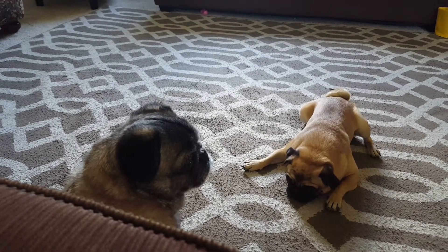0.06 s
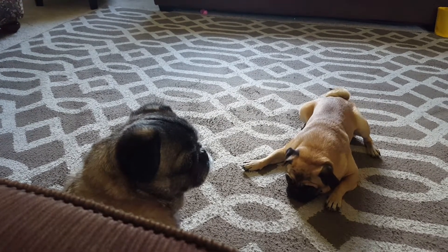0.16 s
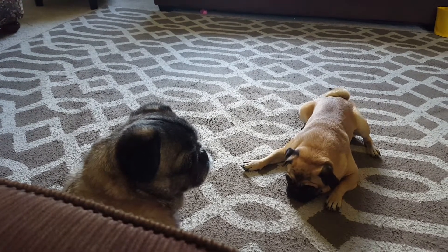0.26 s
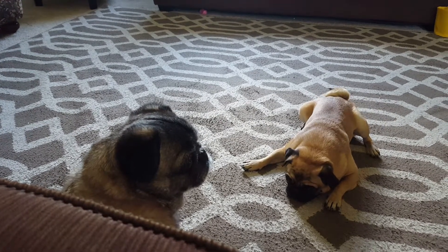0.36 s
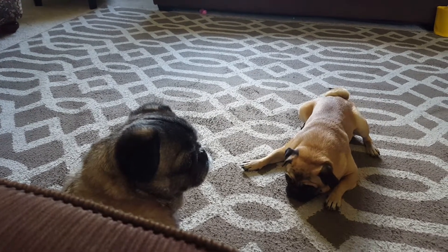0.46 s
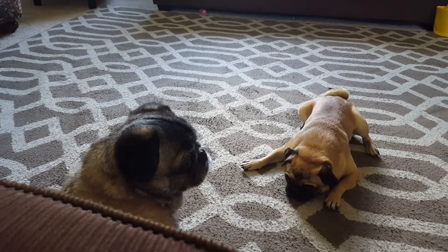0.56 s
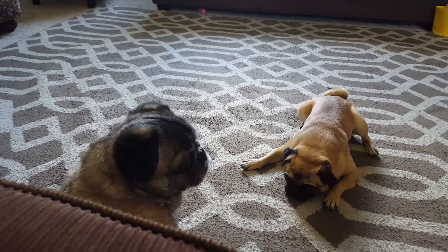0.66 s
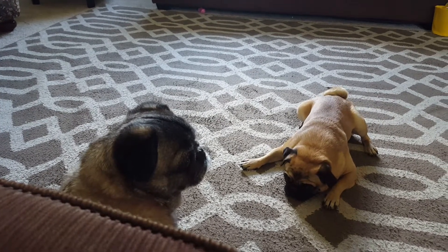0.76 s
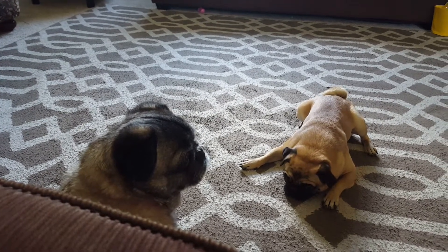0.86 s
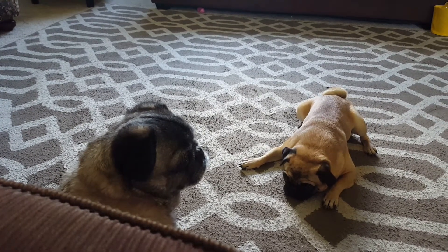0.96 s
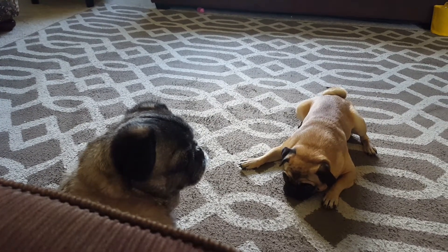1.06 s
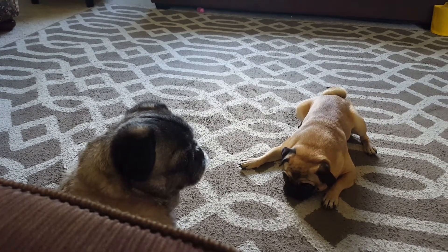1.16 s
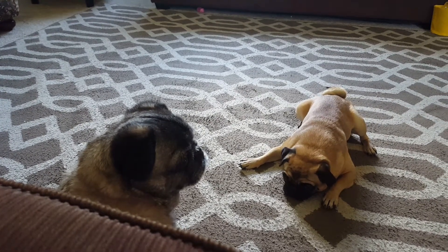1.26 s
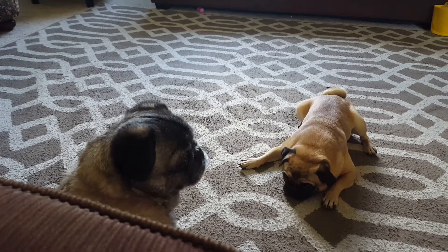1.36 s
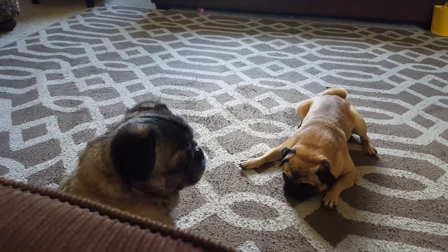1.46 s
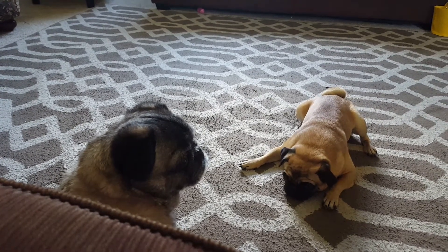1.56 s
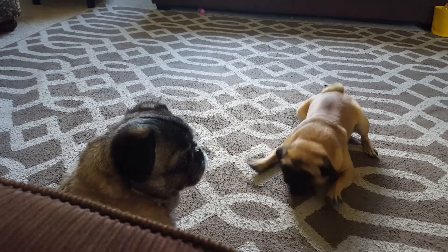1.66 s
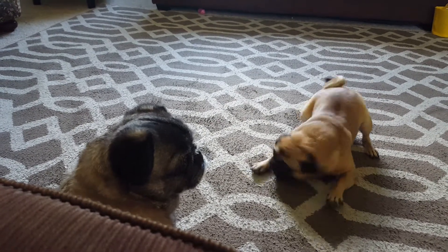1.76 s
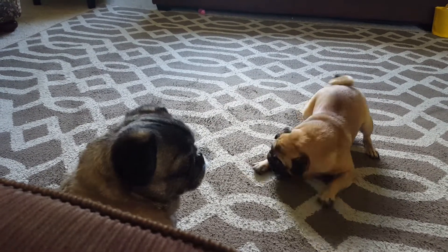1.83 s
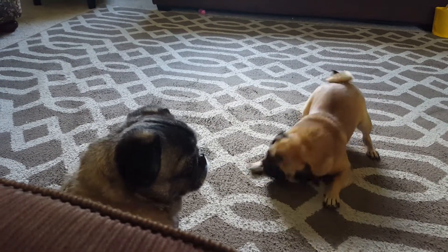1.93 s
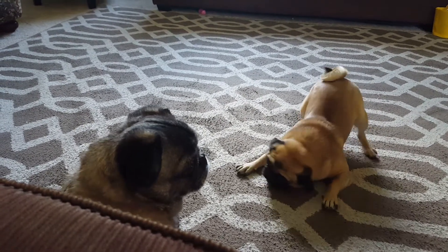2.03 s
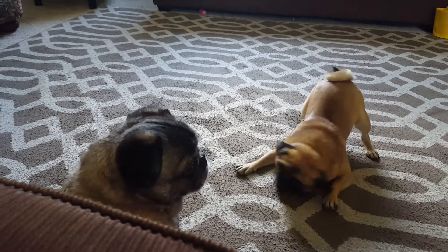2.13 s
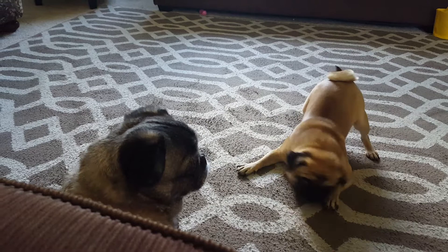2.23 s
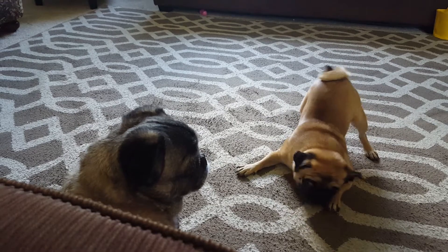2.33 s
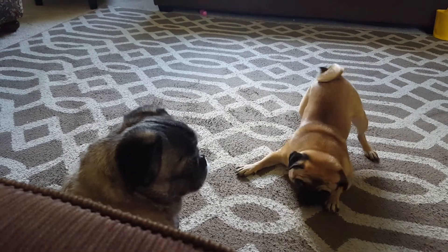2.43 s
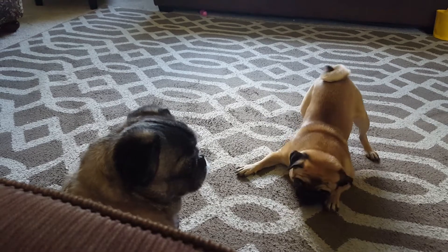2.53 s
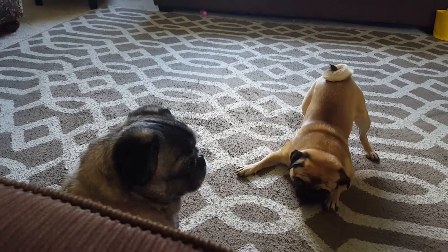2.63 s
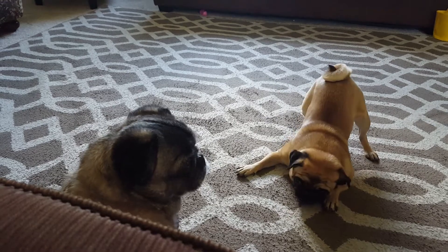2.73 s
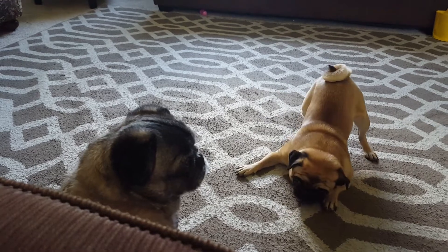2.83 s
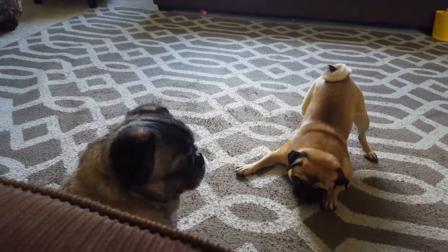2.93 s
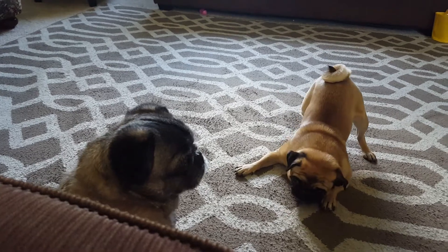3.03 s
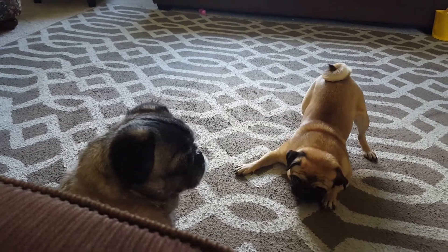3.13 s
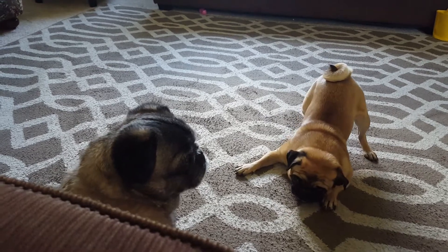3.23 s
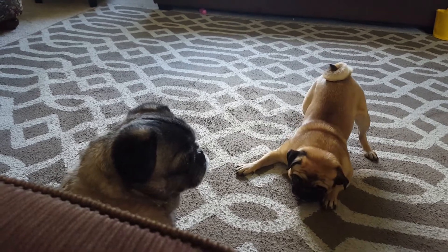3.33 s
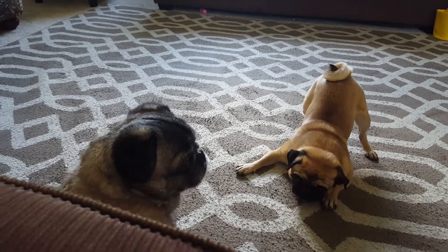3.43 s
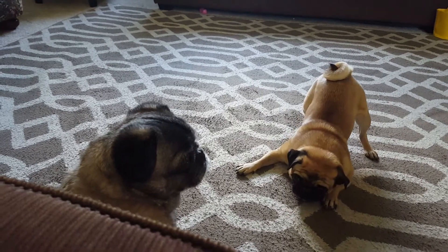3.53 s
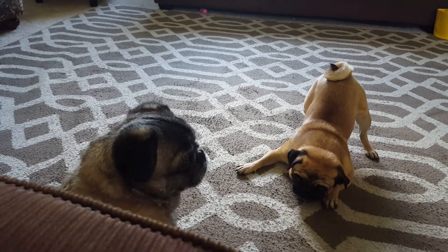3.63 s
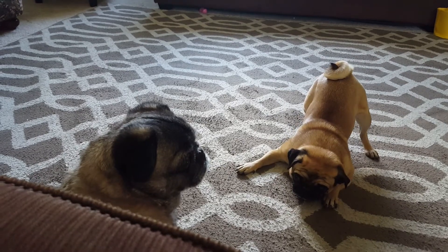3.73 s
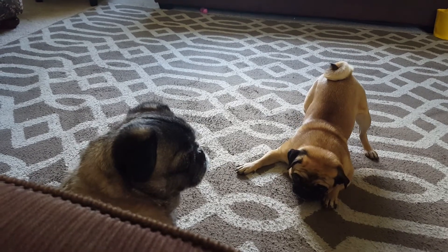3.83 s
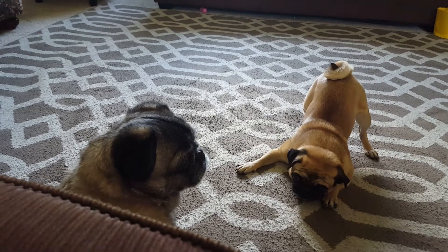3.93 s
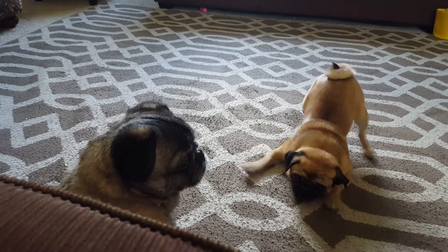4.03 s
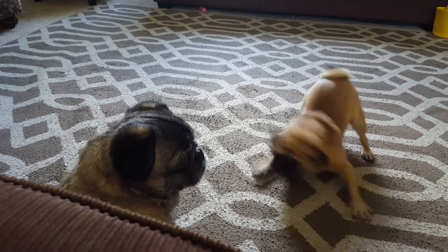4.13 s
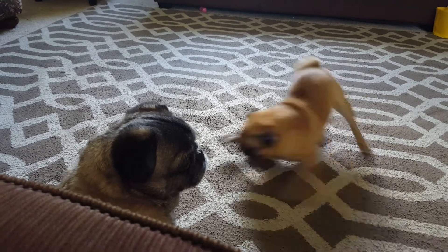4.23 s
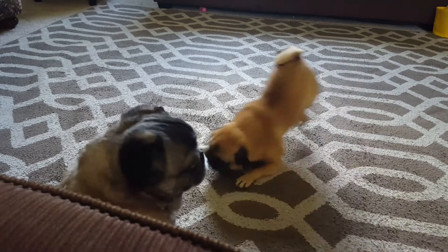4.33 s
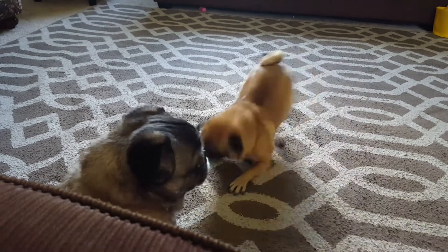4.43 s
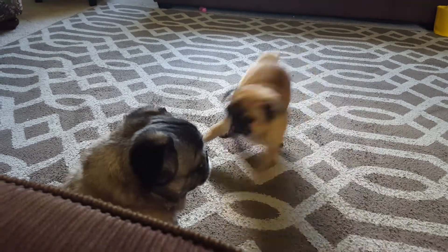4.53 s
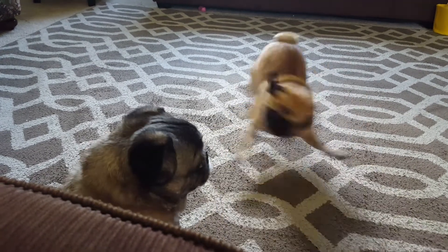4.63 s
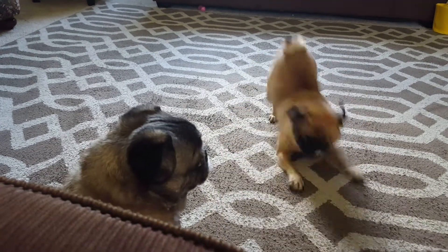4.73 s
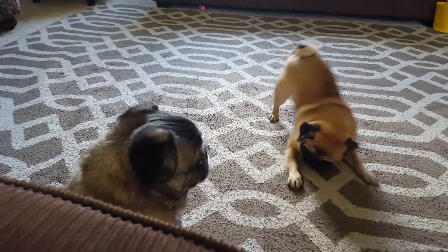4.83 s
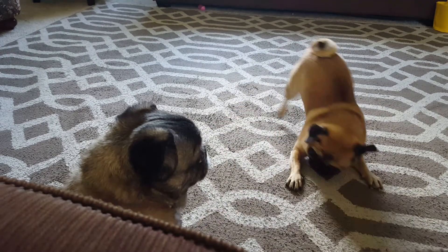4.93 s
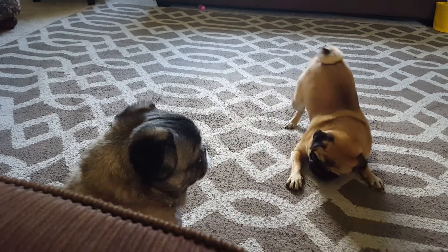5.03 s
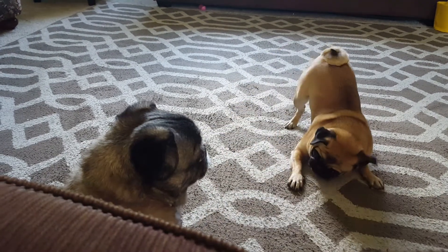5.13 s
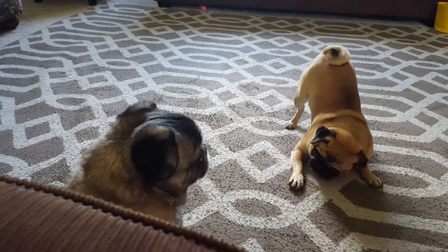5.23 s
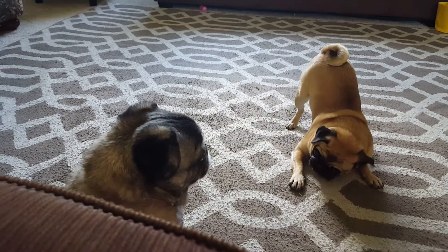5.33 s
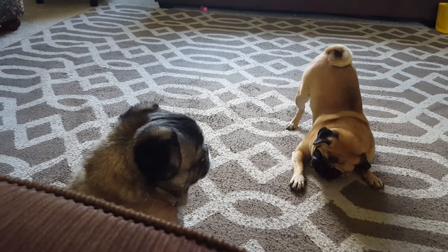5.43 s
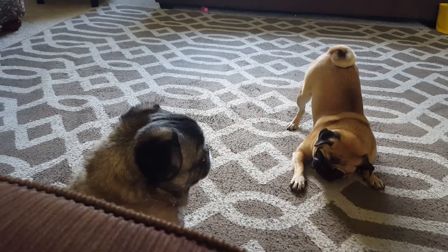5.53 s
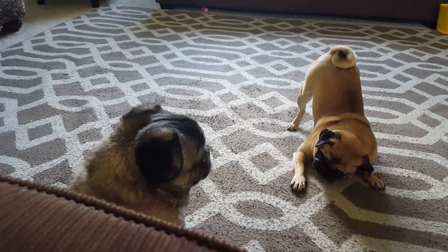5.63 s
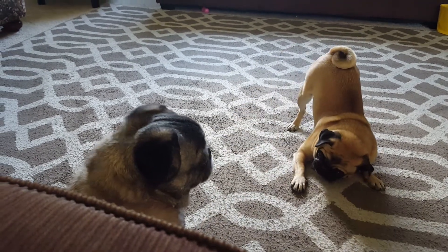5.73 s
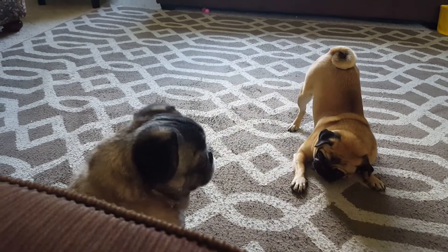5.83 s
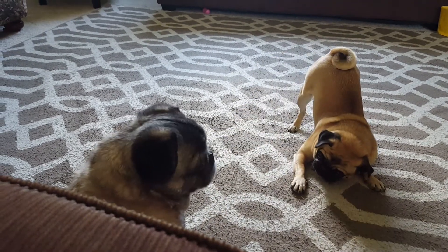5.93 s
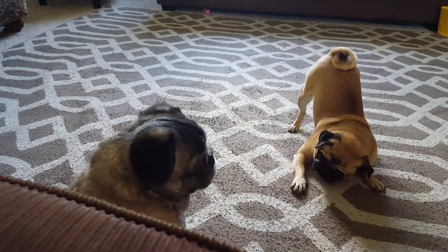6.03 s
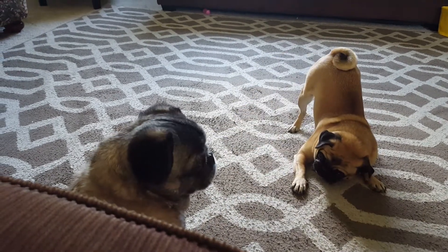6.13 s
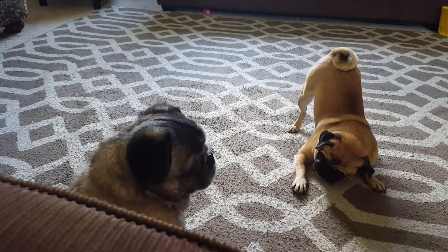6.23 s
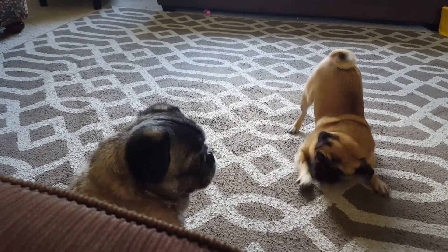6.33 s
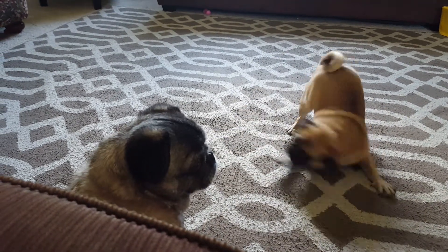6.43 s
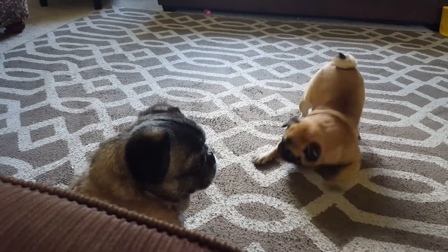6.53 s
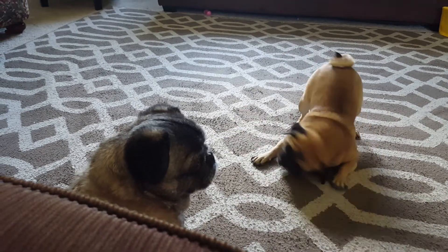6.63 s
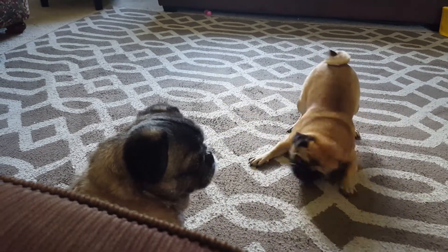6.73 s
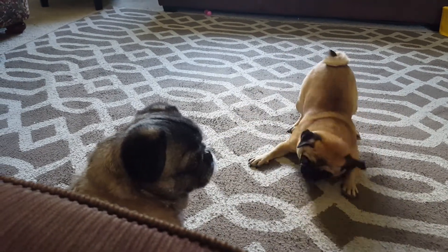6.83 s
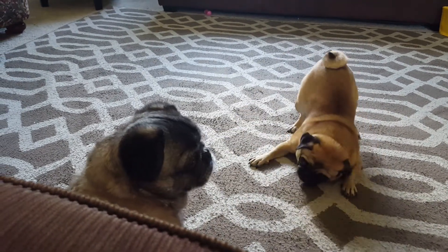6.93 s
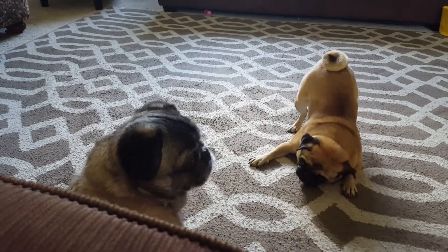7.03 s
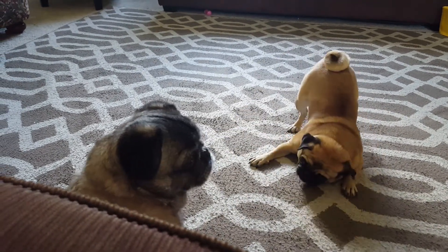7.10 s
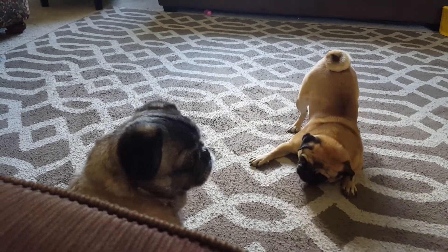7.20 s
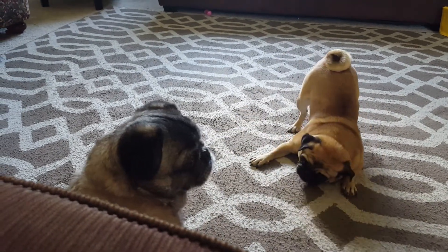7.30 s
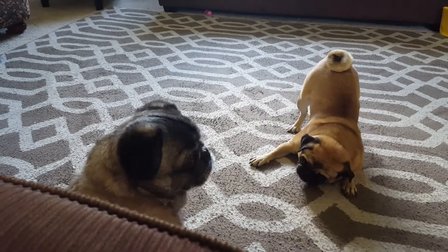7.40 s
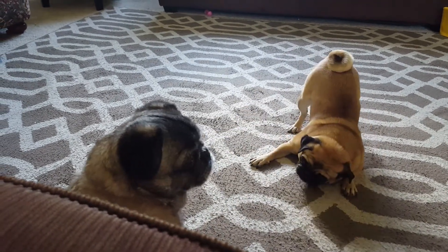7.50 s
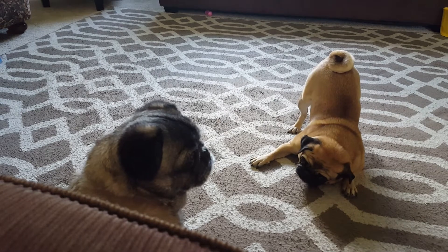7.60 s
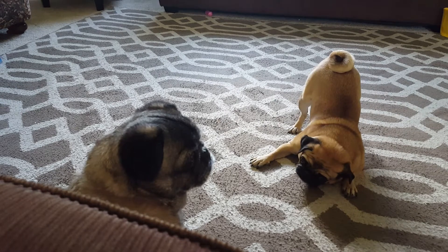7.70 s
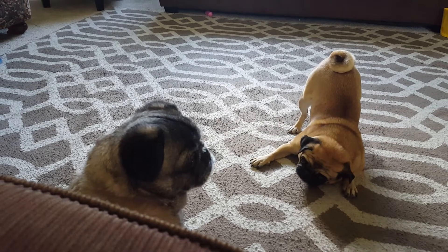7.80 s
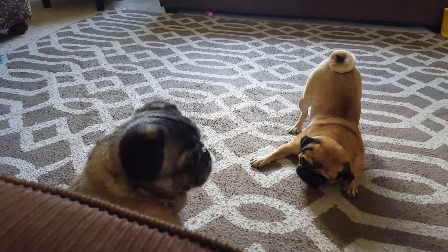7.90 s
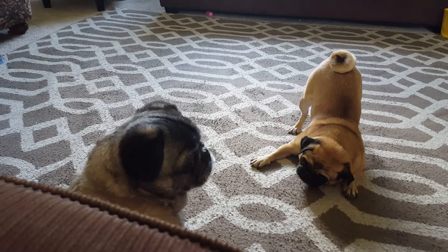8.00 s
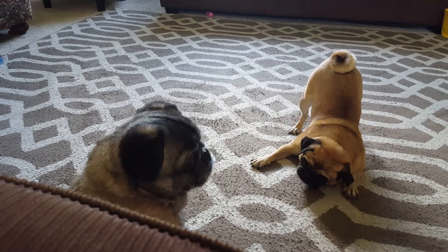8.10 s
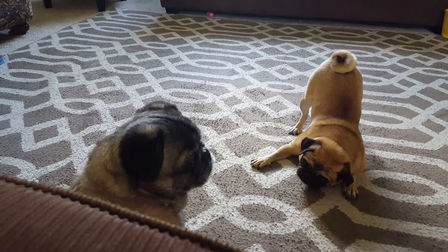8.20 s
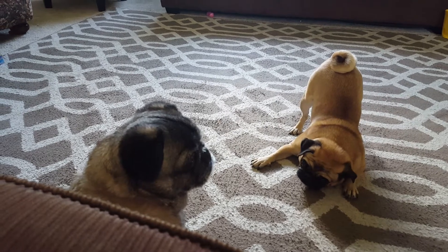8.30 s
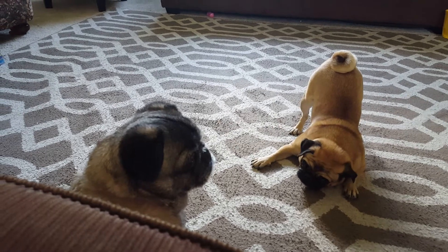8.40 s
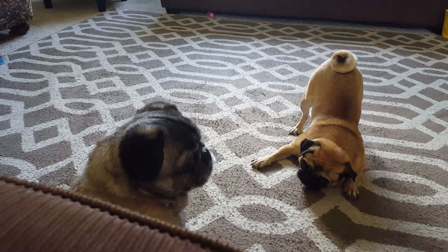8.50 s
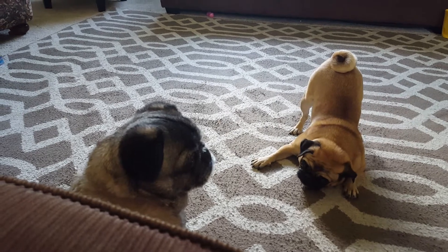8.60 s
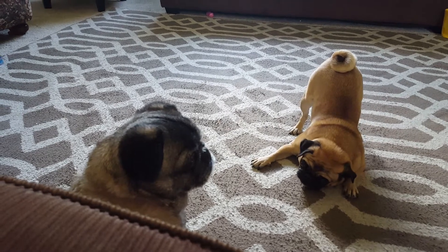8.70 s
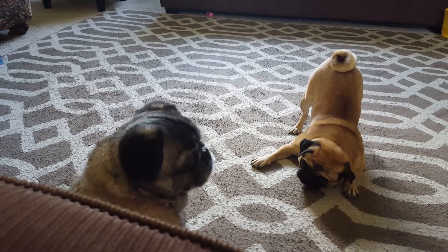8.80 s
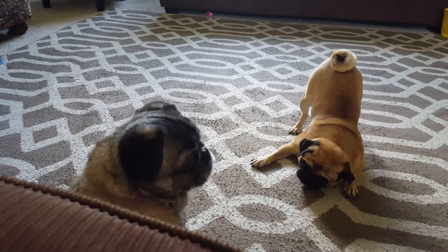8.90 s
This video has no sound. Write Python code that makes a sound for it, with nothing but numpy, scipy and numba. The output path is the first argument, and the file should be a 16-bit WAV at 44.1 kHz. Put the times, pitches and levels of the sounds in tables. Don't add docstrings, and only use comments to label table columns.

```python
import sys
import numpy as np
from scipy import signal
from scipy.fft import rfft, irfft
from scipy.io import wavfile
from scipy.ndimage import uniform_filter1d, minimum_filter1d
from numba import njit

SR = 44100
rng = np.random.default_rng(int(sys.argv[2]) if len(sys.argv) > 2 else 0)


def log_audio(samples):
    frames = np.atleast_2d(samples).T
    limited = np.clip(frames, -1, 1)
    pcm = np.round(limited * 32767).astype(np.int16)
    wavfile.write(sys.argv[1], SR, pcm)


def natural_amplitude(level_db):
    exponent = np.asarray(level_db, float) / 20
    return 10 ** exponent


N = 395136
TIME = np.arange(N) / SR

# time in s, throat level in dB, throat in Hz, push of breath in dB re throat.
FIRST_BURST = [
    [(1.642, -43, 647, -30.5), (1.662, -13.5, 1002, -17.5), (1.69, -3.5, 1210, -20),
     (1.715, -13.5, 1202, -13.5), (1.756, -16.5, 1212, -2.5), (1.81, -21.5, 886, -26.5)],
    [(1.82, -24.5, 1145, -24.5), (1.85, -21, 1265, -8), (1.89, -18, 1060, -5.5), (1.94, -12, 1400, -18),
     (1.97, -15.5, 1169, -7.5), (1.992, -25, 896, -4.5), (2.05, -32.5, 900, -19)],
    [(2.06, -33, 770, -12.5), (2.102, -25.5, 854, -33), (2.15, -19, 1360, -22), (2.205, -17.5, 1356, -7.5),
     (2.26, -24, 1053, -0.5), (2.36, -49.5, 760, -65.5)],
]
SECOND_BURST = [
    [(4.047, -37, 800, -21), (4.056, -33.5, 850, -24), (4.065, -21, 900, -26.5), (4.07, -9.5, 1007, -24),
     (4.095, -7.5, 1118, -37.5), (4.15, -14.5, 1016, -6), (4.198, -22, 989, 0.5), (4.21, -36.5, 989, -11),
     (4.255, -44.5, 1000, -12)],
    [(4.258, -37, 1100, -17.5), (4.294, -15, 1480, -9.5), (4.34, -13.5, 1297, -4), (4.365, -18, 1286, -3),
     (4.385, -27, 1290, -2), (4.52, -47, 1259, -17)],
    [(4.558, -34, 1700, -8.5), (4.573, -41.5, 1600, -14), (4.578, -25, 1450, -10.5),
     (4.6, -13.5, 1600, -23), (4.626, -11.5, 1582, -16), (4.655, -17, 1560, -8),
     (4.675, -30.5, 1550, -14.5), (4.8, -48, 1564, -22)],
]
THIRD_BURST = [
    [(6.352, -47.5, 800, -20), (6.36, -43, 850, -24), (6.363, -14.5, 874, -26), (6.376, -17.5, 1200, -28.5),
     (6.387, -11, 1400, -28.5), (6.415, -14.5, 1200, -4), (6.445, -16, 1150, -5), (6.47, -15.5, 1050, -5.5),
     (6.575, -38, 950, -13)],
    [(6.578, -39.5, 1010, -18.5), (6.602, -27, 1400, -14.5), (6.608, -19.5, 1440, -27),
     (6.66, -15, 1300, -9.5), (6.7, -19.5, 1400, -1), (6.742, -20.5, 1150, -1), (6.768, -32, 970, -13),
     (6.88, -49, 990, -6.5)],
]
ALL_BARKS = FIRST_BURST + SECOND_BURST + THIRD_BURST
# time in s, pitch in Hz.
BARK_PITCH = [
    [(1.642, 170), (1.665, 222.4), (1.688, 261.3), (1.722, 216.2), (1.752, 265.4), (1.8, 288.3)],
    [(1.81, 598.8), (1.85, 634), (1.877, 763.3), (1.882, 383.9), (1.9, 422.1), (1.925, 458.1), (1.945, 451),
     (1.98, 389.3)],
    [(2.05, 345.4), (2.1, 350.8), (2.145, 592.9), (2.175, 630.2), (2.205, 693.6), (2.235, 720.4),
     (2.26, 538.7)],
    [(4.05, 330), (4.09, 360.3), (4.15, 335.5)],
    [(4.26, 372.4), (4.3, 429.1), (4.335, 326.7)],
    [(4.558, 125.9), (4.595, 150.7), (4.62, 127.5), (4.64, 111.3), (4.66, 105.4)],
    [(6.352, 429.8), (6.372, 403.5), (6.39, 462.4), (6.41, 400), (6.45, 378.4), (6.48, 335.6)],
    [(6.58, 298.2), (6.645, 392.3), (6.67, 451), (6.74, 477.7)],
]
START_ROUGHNESS = [.12, .45, .1, .5, .5, .12, .42, .55]
# time in s, muzzle width in Hz, throat width at the start in Hz,
# top of the air in dB.
GAPE = [(1.754, 1700, 522.4, -3.5), (1.979, 1400, 900, 1), (2.232, 1800, 900, -3.5), (4.189, 1700, 420, -6),
        (4.34, 1100, 560, -3), (4.65, 1200, 417, -4), (6.447, 1900, 500, -2), (6.691, 1600, 950, -6)]
# time in s, mouth in Hz, mouth level in dB re throat, muzzle in Hz,
# cheeks 0-1.
FIRST_MOUTH = [
    [(1.642, 1200, -21, 3400, 0), (1.67, 1776, -6.5, 3700, 0.34), (1.7, 2353, -1, 4100, 0.05),
     (1.73, 2950, -4, 4600, 1), (1.76, 2687, -9.5, 4900, 0), (1.81, 2410, -15.5, 4500, 0.4)],
    [(1.82, 1900, -6.5, 3700, 0), (1.87, 2090, -4, 3900, 1), (1.93, 3226, -4.5, 4500, 1),
     (1.98, 2767, -8.5, 5100, 0.34), (2.05, 2500, -13, 4800, 0.05)],
    [(2.06, 1970, -2, 4700, 0.4), (2.11, 2200, -6.5, 4700, 1), (2.19, 2650, -4.5, 4810, 1),
     (2.27, 2480, -11, 4700, 0.12), (2.36, 2475, -29, 4600, 0.05)],
]
SECOND_MOUTH = [
    [(4.047, 1400, -10.5, 6263, .2), (4.075, 1800, -8, 6420, 0.23), (4.1, 2150, -1.5, 5100, 0.12),
     (4.13, 2500, -13.5, 4785, 0.39), (4.16, 2700, -14.5, 4360, 0.16), (4.19, 2730, -2.5, 3863, 0.061),
     (4.255, 2722, -11.5, 4500, .15)],
    [(4.258, 1700, -11.5, 2627, .3), (4.3, 2300, -13.5, 2955, 0.26), (4.34, 2600, -15, 3780, 0.26),
     (4.37, 2668, -5, 4327, 0.15), (4.52, 2600, -15.5, 4430, .2)],
    [(4.558, 2000, -10.5, 3316, 0.1), (4.58, 2250, -1, 3520, 0.1), (4.61, 2600, -14.5, 3738, 0.1),
     (4.655, 3050, -4.5, 4030, 0.6), (4.8, 2296, -11.5, 4150, 0.49)],
]
THIRD_MOUTH = [
    [(6.352, 1196, -25, 4970, 0.067), (6.388, 2080, -2, 5110, 0.14), (6.415, 2554, -16.5, 4555, 0.76),
     (6.445, 2906, -2, 4010, 0.049), (6.5, 2540, -5.5, 3800, 0.03), (6.575, 2563, -5, 4200, 0.1)],
    [(6.578, 1700, -9.5, 4200, 0.33), (6.63, 2313, -6.5, 4140, 0.49), (6.67, 2890, -8, 4150, 1),
     (6.72, 2580, -6, 4280, 0.5), (6.76, 2670, -9, 4600, 0.061), (6.88, 2650, -20, 4400, 0.15)],
]
# time in s, centre in Hz, level in dB re throat.
PHARYNX = [
    [(1.642, 901, -15.5), (1.75, 888, -10), (1.81, 800, -5.5)],
    [(1.82, 596, -3.5), (1.85, 640, -5), (1.9, 880, -8), (1.95, 860, -11), (1.99, 870, 2),
     (2.05, 886, -3.5)],
    [(2.06, 708, -4), (2.105, 706, -9), (2.115, 481, -10.5), (2.15, 611, -13), (2.19, 778, -7),
     (2.24, 911, -1.5), (2.36, 800, 6)],
    [(4.047, 880.6, -7.5), (4.15, 869, -8), (4.255, 837.3, -7)],
    [(4.258, 780, -0.5), (4.3, 954, -12), (4.35, 710, -15), (4.38, 756, 5.5), (4.52, 760, 4)],
    [(4.558, 903, -19.5), (4.8, 915, -24.5)],
    [(6.352, 897, -3), (6.37, 892, -1.5), (6.4, 850, -7), (6.425, 987, 0.5), (6.575, 950, -10)],
    [(6.578, 800, -8), (6.65, 769, -10), (6.67, 929, -5.5), (6.73, 930, 3.5), (6.88, 920, -3)],
]
AIR_DB = [-24, -26.5, -25, -22, -27, -21, -24, -23]
CHEST_DB = [-29, -27.5, -21.5, -22.5, -20, -26, -19, -23.5]
# centre in Hz, width in Hz, level in dB.
TEETH = [(7230, 3100, -2), (8860, 510, -13), (12600, 4300, -6), (14710, 1800, -14.5)]
GAPE_ROUGHNESS, MUZZLE_LAG_POWER, MOUTH_WIDTH_HZ = .55, 1.3, 700
CLOSE_S, LATE_WIDTH_SHARE = 0.07, 0.27
AIR_FOLLOWS = 0.33
TEETH_WANDER, TEETH_OWN = .07, 1.1

# time in s, level in dB, pitch in Hz.
GROWLS = [
    [(0.3, -56.5, 150), (0.59, -66.5, 160.8), (0.597, -49.5, 169.1), (0.64, -50, 157.8),
     (0.755, -50, 151.7), (0.94, -44.5, 172.4), (1.076, -46, 176), (1.164, -44.5, 189.6),
     (1.375, -46.5, 205.8), (1.385, -45.5, 110.6), (1.5, -44, 118.9), (1.64, -44.5, 117.7)],
    [(3.5, -54, 143.8), (3.6, -54.5, 138.6), (3.89, -47.5, 166), (4.012, -46, 179), (4.045, -49, 180.3)],
    [(6.8, -54, 149.2), (7.118, -54, 162), (7.296, -50, 175.6), (7.62, -46.5, 180.7), (7.68, -47, 188.2),
     (7.71, -47, 200.5), (7.8, -44, 195), (7.807, -46, 147.6), (7.857, -43, 144), (7.92, -58.5, 144.3)],
]
# time in s, level in dB, pitch in Hz.
GRUMBLE = [
    [(8.092, -47, 125.2), (8.15, -37.5, 133.6), (8.225, -40, 118.7), (8.35, -44, 102.3),
     (8.44, -43.5, 109.8), (8.49, -43.5, 101.4), (8.528, -42, 89.8), (8.64, -39, 82.36), (8.706, -39, 84.9),
     (8.78, -41.5, 79.1), (8.872, -42.5, 66), (8.96, -39, 61.68)],
]
# start in s, end in s, roughness 0-1.
RATTLE = [(0, .59, .9), (1.15, 1.38, .2), (1.38, 1.66, .35), (3.5, 4.05, .05), (6.8, 7.42, .05),
          (7.42, 7.8, .2), (7.8, 7.95, .6), (8.09, 8.5, .55), (8.5, 8.8, .12), (8.8, 8.96, .3)]
# centre in Hz, width in Hz, level in dB.
CHEST = [(170, 42, 7.5), (336, 90, -4.5), (537, 270, -1.5)]
# centre in Hz, width in Hz, level in dB.
JAWS = [(730, 67, -1.5), (1060, 240, 3.5), (1400, 360, -1.5), (1710, 630, 1), (2440, 760, -5)]
# centre in Hz, width in Hz, level in dB.
NOSE = [(4600, 1200, 4.5), (7700, 500, -15), (12460, 1300, -22)]
# time in s, level in dB.
LIPS = [(1.2, -14), (1.4, -8), (1.64, 7), (3.5, -12), (4.04, -3), (7.4, -9), (7.44, -14), (7.92, -3)]
# centre in Hz, width in Hz, level in dB.
DEEP_CHEST = [(141, 110, 12), (276.5, 230, 9.5), (544, 320, 9)]
# width in Hz, level in dB.
DEEP_JAWS = [
    (210, 30.5),
    (250, 23.5),
    (500, 15.5),
]
# centre in Hz, width in Hz, level in dB, share of the nostril level.
DEEP_NOSE = [(4900, 670, 3.5, 1.1), (7940, 2400, -10, -0.75), (11960, 2400, -4, 1.4)]
# time in s, first in Hz, second in Hz, third in Hz, nostrils in dB.
GRUMBLE_JAWS = [(8.09, 686, 1555, 1100, -8.5), (8.2, 740, 1560, 1090, 2), (8.36, 720, 1810, 1177, 3.5),
                (8.41, 650, 1430, 1050, -4), (8.45, 653, 1600, 1053, 2), (8.55, 1037, 1466, 1660, -3.5),
                (8.78, 1030, 1440, 1610, -5.5), (8.82, 910, 1630, 1305, -2), (8.96, 950, 1580, 1300, -5)]
SMOOTH_ROUGHNESS = .11

# start in s, swell in s, peak in dB, fade in dB per s,
# nostril whistle in dB re snout.
SNORTS = [
    (2.39, 0.061, -39, 122.5, -22.5),
    (3.117, 0.027, -56, 39, -3),
    (4.76, 0.13, -44, 73, -13.5),
    (5.675, .03, -66.5, 70.5, -16),
    (6.9, 0.074, -45, 172, -21),
]
# centre in Hz, width in Hz, level in dB.
SNOUT = [(350, 610, 6.5), (800, 600, 11.5), (1550, 580, 17), (2200, 860, -14), (4200, 2500, -3.5)]
# centre in Hz, width in Hz, level in dB.
NOSTRILS = [(6010, 490, 18), (7430, 1000, 14), (8650, 900, 10.5), (9300, 1000, 9.5)]
# loudest time in s, level in dB, pitch in Hz.
FLUTTER = [
    (2.453, -29, 253.3),
    (6.974, -38, 223.3),
]
SNORT_SWELL_DB, SNORT_LONGEST_S, WHISTLE_LAG_S = 9, .385, 0.066
FLUTTER_RISE_DB_PER_S, FLUTTER_FALL_DB_PER_S, FLUTTER_SAG_HZ_PER_S = 390, 161.5, 880

# time in s, peak in dB, low part in dB re peak, ring in Hz.
SMACKS = [(0.0533, -51.5, 9, 4900), (1.5342, -46, 2, 4900), (2.5217, -30.5, 15.5, 4900),
          (2.5571, -42.5, 14.5, 5030), (2.636, -52, -8, 4000), (2.701, -51.5, -8, 3500),
          (3.318, -50.5, -6, 4000), (4.92, -52, 8, 1600), (5.03, -47.5, -1, 2200), (5.133, -55, 3, 1594),
          (2.6455, -52.5, 1, 4450), (2.6713, -43.5, -4, 5440), (2.848, -51.5, -8, 3700),
          (2.877, -49, -7, 4800), (3.2402, -47.5, 11, 4000), (3.258, -43.5, -9, 5470),
          (3.2753, -45, -9, 4200), (4.049, -39, 7.5, 6640), (4.059, -32.5, 8.5, 6500),
          (6.355, -40, 4.5, 4997), (6.362, -32.5, 7.5, 5030), (4.851, -46, -8, 7500),
          (4.8906, -30, 1.5, 1650), (5.037, -54, -6, 7800), (3.13, -58, 25.5, 1600), (8.1, -55, 0, 1567),
          (4.9288, -40.5, -4.5, 4940), (4.9582, -39, 13, 4920), (4.9927, -45.5, 9, 5290)]

# time in s, peak in dB, pitch in Hz, left minus right in dB.
BUMPS = [(0.041, -44, 152, 23), (0.137, -43, 95, 24), (0.159, -36.5, 92, 24), (0.224, -37, 81, 23),
         (0.262, -35, 149, 21.5), (0.281, -35, 81, 8), (3.19, -41, 96, 11.5), (3.3, -43, 94.8, 23),
         (3.317, -45.5, 109.6, 19), (3.909, -36.5, 113, 27), (4.788, -41.5, 74, 0), (4.821, -40.5, 79.8, 2),
         (5.219, -43, 80.3, 24), (5.245, -32, 139.3, 24.5), (7.969, -49.5, 68.2, 29)]
# time in s, rumble in dB, build in dB per s, ease in dB per s.
GRIP = [(.25, -41.5, 26, 95), (1.302, -52, 6.5, 18), (3.95, -36.5, 27.5, 197), (5.302, -47, 21.5, 94.5),
        (7.85, -53, 27, 22)]
GRIP_REST_DB = -62.5

# frequency in Hz, level in dB per Hz.
ROOM_TONE = [(35, -39), (60, -21.5), (139, -5), (175, -9.5), (277, -2.5), (422, -11.5), (590, -20.5),
             (791, -23), (1420, -29), (9000, -49), (11700, -77.5), (19800, -120)]
# frequency in Hz, likeness -1 to 1.
LIKENESS = [(60, 0.85), (180, 1.2), (550, 0.85), (1650, -0.13), (4970, 0.14), (15000, -1)]
# time in s, level in dB.
ROOM_TONE_DB = [(0, -48), (2.9, -51), (4.8, -44), (5.25, -56), (5.6, -50), (6.3, -49.5), (7.2, -55),
                (8.0, -48.5), (8.96, -48.5)]

# frequency in Hz, left minus right in dB.
PORTS = [(60, 11), (110, 1.5), (200, 1), (380, 3), (700, 0.5), (1290, -0.5), (2380, 2.5), (4400, -9),
         (8120, 10), (15000, -4.5)]
# frequency in Hz, lead of the left in radians.
PORT_PHASE = [(0, 0), (5860, 1.53), (10900, 2), (12200, 11), (15800, 17.5)]
ROOM_T60_S, ROOM_DB, WALL_CUT_HZ = 0.33, -18.5, 2100
SCATTER_DB, SCATTER_T60_S, SCATTER_HZ = -9, .03, 3300
HISS_DB, HISS_HZ, HISS_WIDTH_HZ = -71, 13000, 5900
LIMIT = .98


def barks():
    gate, level_db, throat_hz, muzzle_db = joined(ALL_BARKS)
    which, way_open, closing = jaw_swing()
    widening = way_open ** MUZZLE_LAG_POWER
    muzzle_width, throat_width, top_db = np.array(GAPE)[which, 1:].T
    mouth_hz, mouth_db, muzzle_hz, cheeks = joined(FIRST_MOUTH + SECOND_MOUTH + THIRD_MOUTH)[1:]
    pharynx_hz, pharynx_db = joined(PHARYNX)[1:]
    throat_width = throat_width * (1 - (1 - LATE_WIDTH_SHARE) * closing)
    rough = np.array(START_ROUGHNESS)[which] * (1 - widening) + GAPE_ROUGHNESS * widening
    voice, puffs = folds(joined(BARK_PITCH)[1], rough)

    throat = steep(steep(voice, throat_hz, throat_width), throat_hz, 1.8 * throat_width)
    throat = throat + cheeks * steep(voice, 1800.0, 1900.0)
    throat = even(cut(throat, [700, 1950], "band", order=4), size=700)
    mouth = steep(steep(voice + .4 * puffs, mouth_hz, MOUTH_WIDTH_HZ), mouth_hz, 1400.0)
    muzzle = steep(steep(voice + 2.0 * puffs, muzzle_hz, muzzle_width), muzzle_hz, 2.7 * muzzle_width)
    upper = natural_amplitude(mouth_db) * even(mouth, size=700) + natural_amplitude(muzzle_db) * even(muzzle, size=700)
    pharynx = natural_amplitude(pharynx_db) * even(steep(voice, pharynx_hz, 220.0), size=700)
    air_db = np.array(AIR_DB)[which] + AIR_FOLLOWS * muzzle_db
    air = natural_amplitude(air_db) * teeth(puffs, top_db)
    chest_db = np.array(CHEST_DB)[which] + 3.8 * drift(31)
    chest = natural_amplitude(chest_db) * even(cut(voice + 0.4 * puffs, [180, 520], "band", order=3))
    return gate * natural_amplitude(level_db) * (throat + upper + pharynx + air + chest)


def jaw_swing():
    starts = np.array([t[0][0] for t in ALL_BARKS])
    which = np.clip(np.searchsorted(starts, TIME) - 1, 0, None)
    age, gape_s = np.clip(TIME - starts[which], 0, None), np.array(GAPE)[which, 0]
    way_open = np.clip(age / (gape_s - starts[which]), 0, 1)
    return which, way_open, np.clip((TIME - gape_s) / CLOSE_S, 0, 1)


def folds(pitch, rough):
    cycles = np.cumsum(pitch * (1 + .125 * rough * drift(90))) / SR
    closure = np.diff(np.floor(cycles), prepend=0) * natural_amplitude(4 * rough * np.clip(drift(200), -3, 1.5))
    puffs = even(rng.standard_normal(N) * (0.4 + np.exp(-4.5 * (cycles % 1))))
    return np.sqrt(1 - rough ** 2) * even(closure, size=3000) + rough * puffs, puffs


def teeth(puffs, top_db):
    eddies, out = puffs + TEETH_OWN * rng.standard_normal((2, N)), 0
    for hz, width, db in TEETH:
        wander_hz = hz * (1 + TEETH_WANDER * np.tanh(drift(10)))
        gain = natural_amplitude(db + top_db * (hz > 10000) + 2.6 * drift(12))
        out = out + gain * np.array([even(steep(port, wander_hz, width)) for port in eddies])
    return out


def growls():
    (hz, width, db), *upper = JAWS
    parted = [(hz, width, db + joined([LIPS])[1])] + upper
    rising = growl(GROWLS, CHEST, parted, NOSE, mouth_db=-17.5, rattle_db=3.0, nose_db=-40.0,
                   strain_db=-1.5, pulsed=0.24)
    *shifting_hz, nostrils_db = joined([GRUMBLE_JAWS])[1:]
    shifting = [(hz, width, db) for hz, (width, db) in zip(shifting_hz, DEEP_JAWS)]
    nose = [(hz, width, db + follows * nostrils_db) for hz, width, db, follows in DEEP_NOSE]
    grumble = growl(GRUMBLE, DEEP_CHEST, shifting, nose, mouth_db=-11.5, rattle_db=6.0,
                    nose_db=-42.5 + nostrils_db, strain_db=4, pulsed=2.0)
    gate, _, pitch = joined(GRUMBLE)
    hum = gate * natural_amplitude(peak_shape(8.25, -37.5, 60, 60)) * np.sin(2 * np.pi * np.cumsum(pitch) / SR)
    return rising + hum + grumble


def growl(tables, chest, jaws, nose, mouth_db, rattle_db, nose_db, strain_db, pulsed):
    gate, level_db, pitch = joined(tables)
    rough = SMOOTH_ROUGHNESS + sum((r - SMOOTH_ROUGHNESS) * (TIME >= a) * (TIME < b) for a, b, r in RATTLE)
    rough = uniform_filter1d(rough, size=1500)
    mouth_db = mouth_db + rattle_db * rough + 5 * rough * drift(14)
    voice, puffs = folds(pitch, rough)
    body = tract(voice, chest) + natural_amplitude(mouth_db) * tract(voice + .2 * puffs, jaws)
    leak_db = nose_db + .5 * (level_db + mouth_db) + strain_db * np.log2(pitch / 100) + 1.1 * drift(4.9)
    return gate * (natural_amplitude(level_db) * body + natural_amplitude(leak_db) * tract(puffs + pulsed * voice, nose))


def snorts():
    rasp = rng.standard_normal(N) * natural_amplitude(2.0 * drift(116.7) + 2.3 * drift(50))
    snout, nostrils, out = tract(rasp, SNOUT), tract(rasp, NOSTRILS), 0
    for s, swell_s, db, fade, whistle_db in SNORTS:
        gate = uniform_filter1d(1. * (TIME > s) * (TIME < s + SNORT_LONGEST_S), size=300)
        level = natural_amplitude(peak_shape(s + swell_s, db, SNORT_SWELL_DB / swell_s, fade))
        flow_up = np.clip((TIME - s) / WHISTLE_LAG_S - .5, 0, 1)
        out = out + gate * level * (snout + natural_amplitude(whistle_db) * flow_up * nostrils)
    for s, db, hz in FLUTTER:
        pitch = np.clip(hz - FLUTTER_SAG_HZ_PER_S * np.clip(TIME - s, 0, None), 100, None)
        level = natural_amplitude(peak_shape(s, db - 4.0, FLUTTER_RISE_DB_PER_S, FLUTTER_FALL_DB_PER_S))
        out = out + level * np.sin(2 * np.pi * np.cumsum(pitch) / SR)
    return out


def smacks():
    out, t = np.zeros(N), np.arange(600) / SR
    for (s, db, low_db, hz), crack in zip(SMACKS, rng.standard_normal((len(SMACKS), 600))):
        bright = (np.sin(2 * np.pi * hz * t) + .2 * crack) * np.exp(-t / .0006)
        pop = np.sin(2 * np.pi * 1000 * t + crack[0]) * np.exp(-t / .0016) * (1 - np.exp(-t / .0003))
        out[round(s * SR):][:600] += natural_amplitude(db) * (bright + natural_amplitude(low_db - 3) * pop)
    return out


def living_room(x):
    t = np.arange(SR // 2) / SR
    wash = cut(rng.standard_normal((3, len(t))), [280, WALL_CUT_HZ], "band", order=1)
    wash = wash * natural_amplitude(-60 * t / ROOM_T60_S) * (t > .004)
    wash = (wash[0] + 2.0 * cut(wash[1:], 1400, "high", order=1)) / np.sqrt(np.sum(wash[0] ** 2))
    scatter = cut(rng.standard_normal((2, len(t))), SCATTER_HZ, "high") * natural_amplitude(-60 * t / SCATTER_T60_S)
    wash = natural_amplitude(ROOM_DB) * wash + natural_amplitude(SCATTER_DB) * scatter / np.sqrt(np.sum(scatter[0] ** 2))
    heard = x + signal.fftconvolve(x, wash, axes=1)[:, :N]
    hz = np.arange(1, N // 2 + 2) * SR / N
    left = natural_amplitude(at_hz(PORTS, hz) / 2) * np.exp(.5j * np.interp(hz, *np.transpose(PORT_PHASE)))
    return irfft(rfft(heard) * [left, 1 / left], N)


def handling(rumble_db):
    lumps = [cut(rng.standard_normal(N), [30, 105], "band") * natural_amplitude(1.1 * drift(3.7)) for port in range(2)]
    lumps = np.array(lumps)
    out = natural_amplitude(rumble_db) * lumps / lumps.std() * natural_amplitude([[4.5], [-7]])
    t = np.arange(2200) / SR
    for s, db, hz, pan_db in BUMPS:
        push = np.sin(2 * np.pi * hz * t) * np.exp(-t * hz * 1.8) * (1 - np.exp(-t * hz * 9)) ** 2 * 3.97
        start = round(s * SR)
        out[:, start:start + 2200] += natural_amplitude(db) * push * natural_amplitude([[pan_db / 2], [-pan_db / 2]])
    return out


def room_tone(room_db):
    out, edges = 0, 40 * 2 ** np.arange(0, 9, .5)
    white = rng.standard_normal((2, 2, N))
    for k, (low, high) in enumerate(zip(edges, edges[1:])):
        mid, side = cut(white[k % 2], [low, high], "band")
        hz = np.sqrt(low * high)
        alike = np.clip(at_hz(LIKENESS, hz), -1, 1)
        gain = natural_amplitude(at_hz(ROOM_TONE, hz) + 1.6 * drift(26))
        out = out + gain * (np.sqrt(1 + alike) * mid + np.sqrt(1 - alike) * side * [[1], [-1]])
    return natural_amplitude(room_db) * out / out.std()


def joined(tables):
    s, *columns = np.transpose(sum([list(t) for t in tables], []))
    gate = sum((TIME >= t[0][0]) * (TIME < t[-1][0] + .012) for t in tables) > 0
    return [uniform_filter1d(gate * 1., size=132)] + [np.interp(TIME, s, c) for c in columns]


def peak_shape(s, db, rise, fall):
    return db - np.where(TIME < s, rise * (s - TIME), fall * (TIME - s))


def at_hz(points, hz):
    return np.interp(np.log(hz), np.log(np.array(points)[:, 0]), np.array(points)[:, 1])


def even(x, size=1800):
    return x / np.sqrt(uniform_filter1d(x ** 2, size=size) + 1e-12)


def drift(rate_hz):
    slow = signal.sosfilt(signal.butter(2, rate_hz, fs=SR, output="sos"), rng.standard_normal(N))
    return slow / slow.std()


def cut(x, hz, kind, order=2):
    return signal.sosfilt(signal.butter(order, hz, kind, fs=SR, output="sos"), x)


@njit
def glide(x, hz, width, sr):
    y = np.zeros(len(x))
    for i in range(2, len(x)):
        r = np.exp(-np.pi * width[i] / sr)
        push = (1 - r * r) / 2 * (x[i] - x[i - 2])
        y[i] = push + 2 * r * np.cos(2 * np.pi * hz[i] / sr) * y[i - 1] - r * r * y[i - 2]
    return y


def steep(x, hz, width):
    hz, width = hz + np.zeros(N), width + np.zeros(N)
    return glide(glide(x, hz, width, SR), hz, width, SR)


def tract(x, modes):
    parts = [(-1) ** k * natural_amplitude(db) * steep(x, hz, width) for k, (hz, width, db) in enumerate(modes)]
    return even(sum(parts), size=3000)


def scene():
    dogs = living_room(barks() + growls() + snorts() + smacks())
    rumble_db = np.max([peak_shape(*row) for row in GRIP], axis=0).clip(GRIP_REST_DB, None)
    return dogs + room_tone(joined([ROOM_TONE_DB])[1]) + handling(rumble_db)


def low_pass(x):
    return signal.sosfilt(signal.butter(12, 15850, fs=SR, output="sos"), x)


def record(dry):
    hiss = np.array([steep(rng.standard_normal(N), HISS_HZ, HISS_WIDTH_HZ) for port in range(2)])
    gain = np.minimum(1, LIMIT / (np.abs(dry).max(axis=0) + 1e-9))
    gain = uniform_filter1d(minimum_filter1d(gain, size=400), size=400)
    top_cut = signal.cheby2(16, 50, 16200, fs=SR, output="sos")
    heard = signal.sosfilt(top_cut, gain * dry + natural_amplitude(HISS_DB) * hiss)
    return low_pass(cut(heard, 36, "high"))


dry = scene()
out = record(dry)
log_audio(out)
```